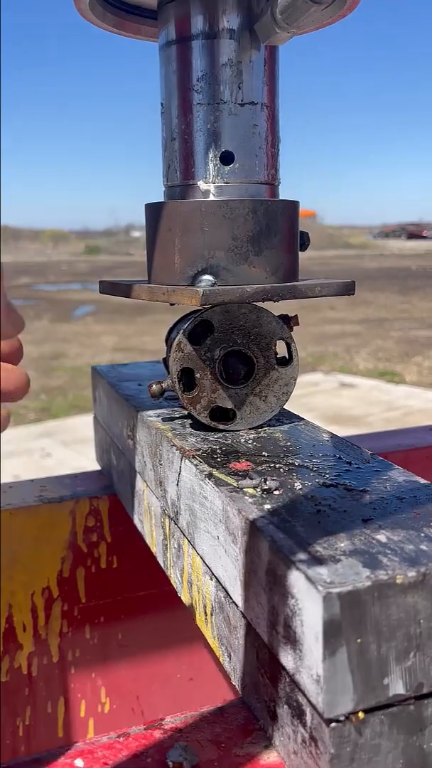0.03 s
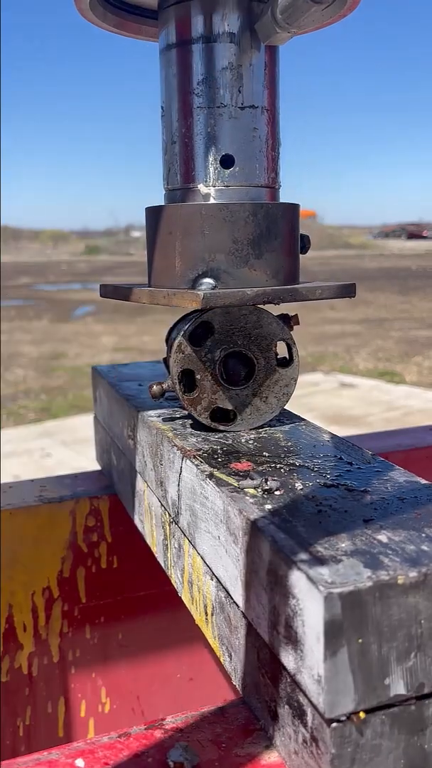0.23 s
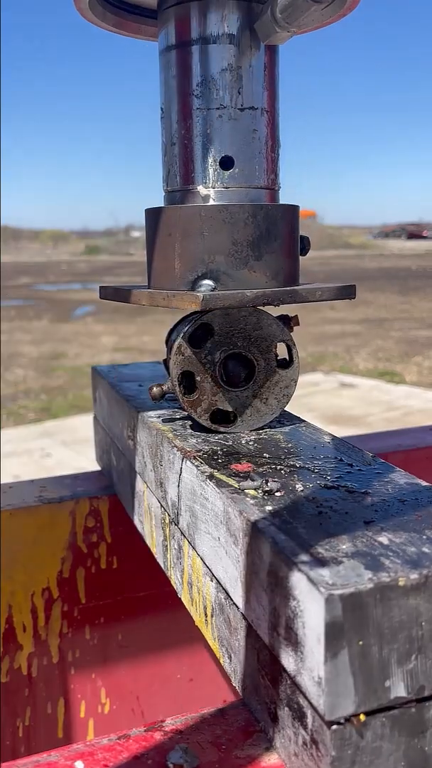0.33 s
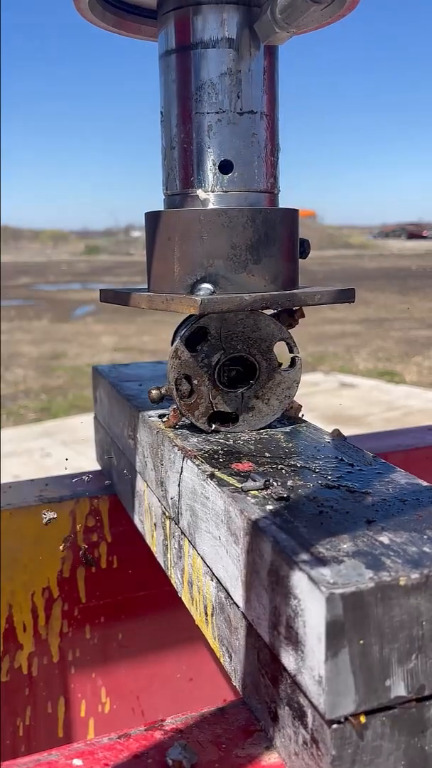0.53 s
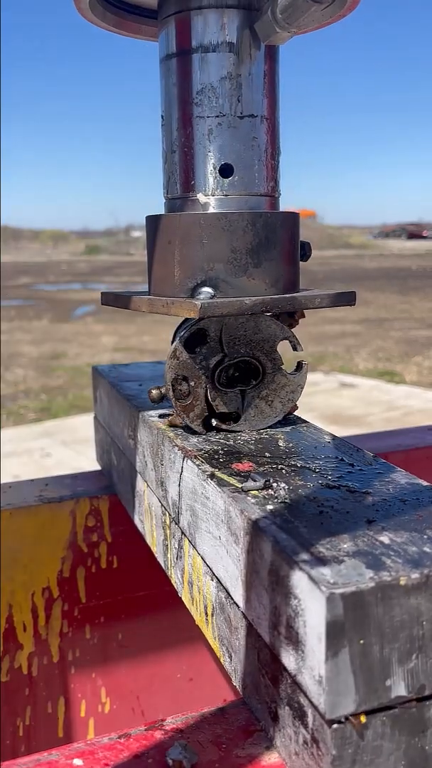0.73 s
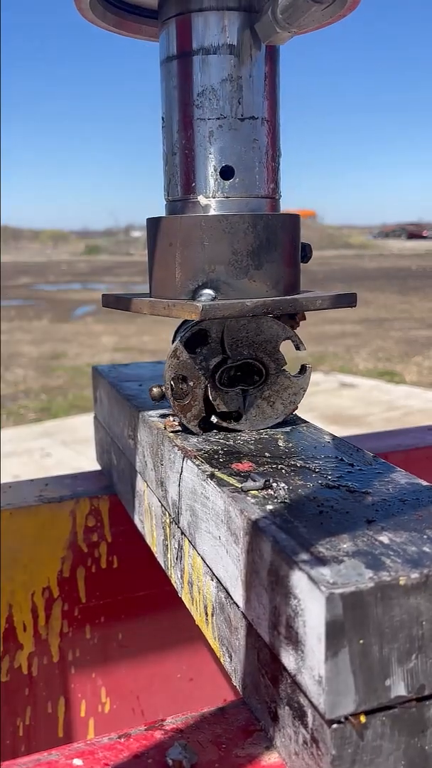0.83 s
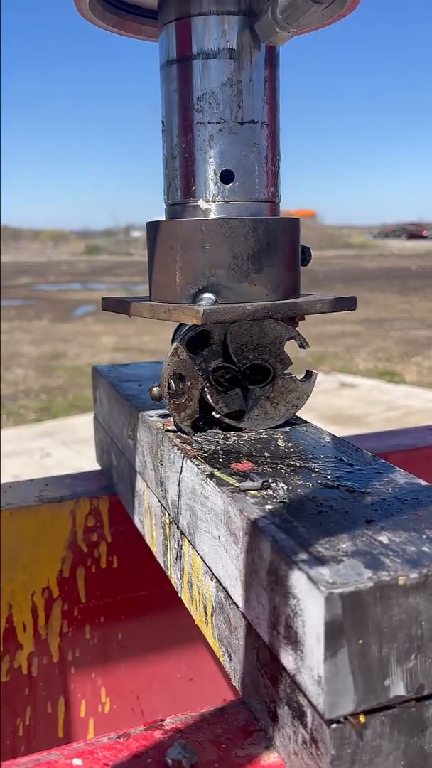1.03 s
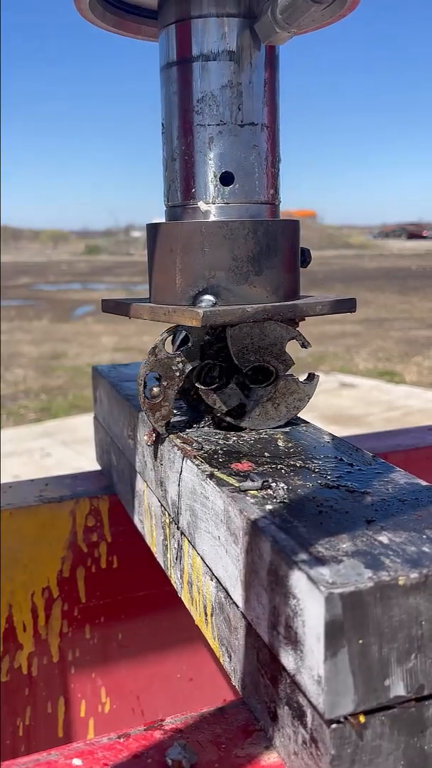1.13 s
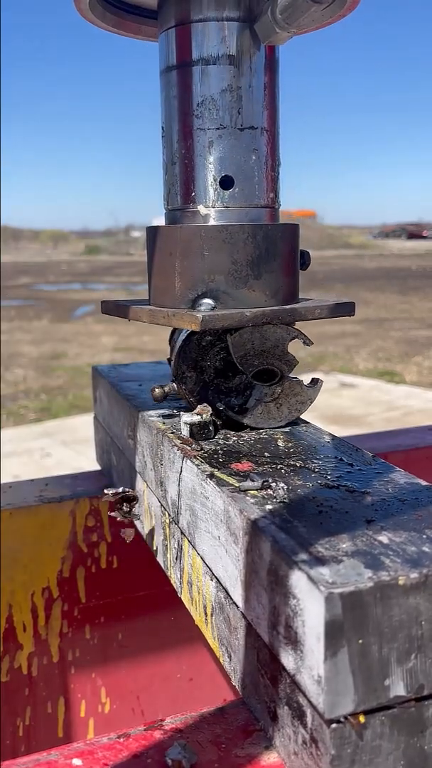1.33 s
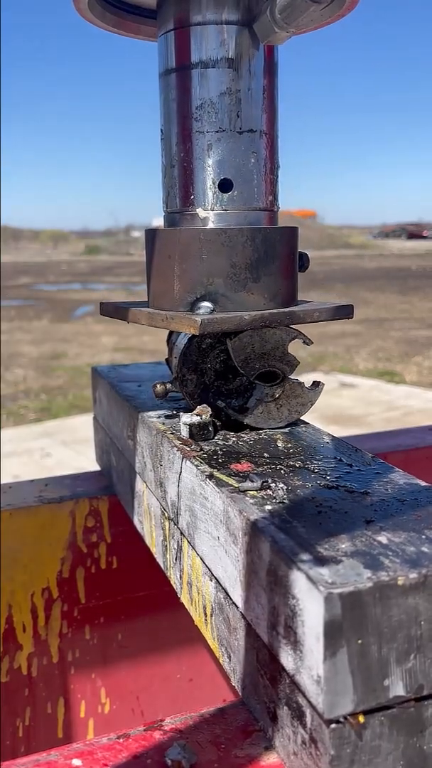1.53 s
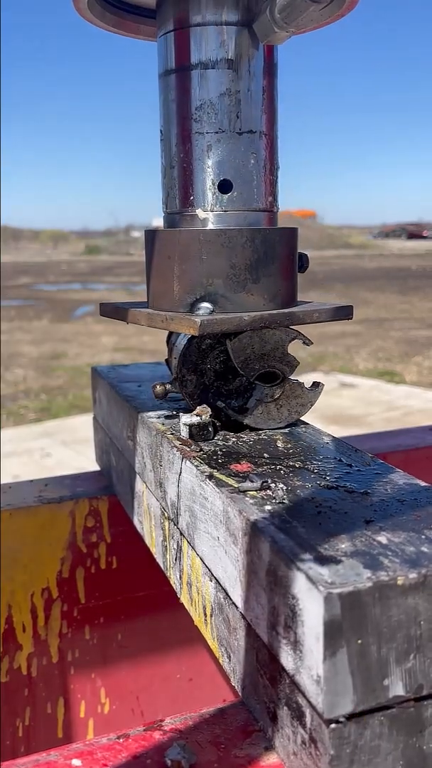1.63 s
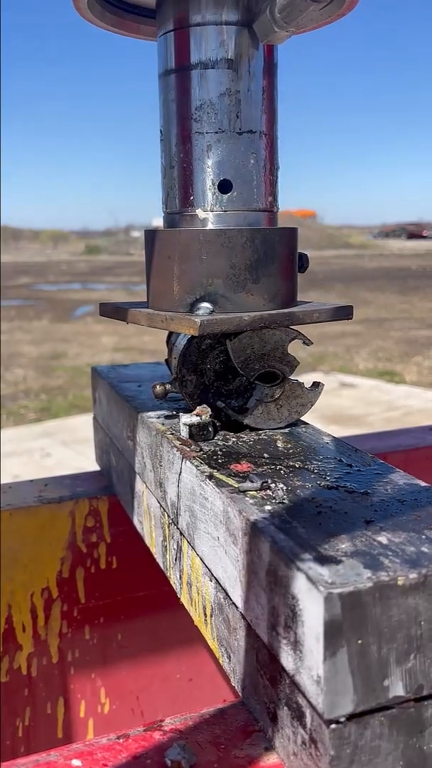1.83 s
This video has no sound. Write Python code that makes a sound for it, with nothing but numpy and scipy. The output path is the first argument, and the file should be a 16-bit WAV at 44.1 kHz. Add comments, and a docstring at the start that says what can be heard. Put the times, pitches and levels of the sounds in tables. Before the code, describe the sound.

Close up and outdoors, a hydraulic press breaks a metal casting with dull crunches and bright cracks, then a loose piece lands and clinks. Underneath, the pump hums, ticks and hisses while a little wind rumbles.

```python
"""A cast metal part is crushed in a hydraulic press, outdoors and close to the microphone.
It yields in dull crunches that jolt the press frame and in bright cracks.
A fragment breaks off and clatters onto the bed; thin tones ring on after the blows.
Sharp high clicks stand out: louder pump ticks among a few snaps of the metal.
The power unit hums, ticks and hisses, quieter once unloaded; a little wind rumbles on the microphone."""
import sys
import numpy as np
from scipy import signal
from scipy.fft import rfft, irfft, next_fast_len
from scipy.io import wavfile
from scipy.ndimage import map_coordinates

SR = 44100
rng = np.random.default_rng(int(sys.argv[2]) if len(sys.argv) > 2 else 0)


def bounce(signal):
    """Save signal as a 16-bit WAV file at the path given by the first command-line argument."""
    frames = np.transpose(np.atleast_2d(signal))
    limited = np.clip(frames, -1, 1)
    pcm = np.round(limited * 32767).astype(np.int16)
    wavfile.write(sys.argv[1], SR, pcm)


N = 83790
TIME_S = np.arange(N) / SR
SIDES = np.array([[.5], [-.5]])  # splits a left-minus-right value


def amp(db):
    return 10 ** (np.asarray(db) / 20)


def unit_rms(x):
    return x / np.sqrt(np.mean(x ** 2) + 1e-20)


def over_hz(points, hz):
    """Interpolate (freq_hz, value) points on a log axis."""
    freqs, values = np.transpose(points)
    return np.interp(np.log(hz + 1), np.log(freqs + 1), values)


def over_time(rows):
    """One per-sample curve for each column after time_s."""
    times, *columns = np.transpose(rows)
    return [np.interp(TIME_S, times, column) for column in columns]


def colour(points):
    """Gain function of a (freq_hz, level_db) spectrum."""
    return lambda hz: amp(over_hz(points, hz))


def wobble(rate_hz):
    """Smooth random curve with knots at rate_hz."""
    return map_coordinates(rng.standard_normal(4096), [TIME_S * rate_hz], mode="mirror")


def filtered(x, response):
    """Apply a complex frequency response."""
    size = next_fast_len(N + 8192)
    return irfft(rfft(x, size) * response(np.fft.rfftfreq(size, 1 / SR)), size)[..., :N]


def noise(gain, coherence=((1000, 1.0),)):
    """Shaped stereo noise of rms 1; both sides are alike by default."""
    def response(hz):
        angle = np.arccos(np.clip(over_hz(coherence, hz), -1, 1)) / 2
        return gain(hz) * np.array([np.cos(angle), np.sin(angle)])
    mid, side = filtered(rng.standard_normal((2, N)), response)
    return unit_rms(np.array([mid + side, mid - side]))


def tone(hz, drift_rad=0):
    """Sine with a random starting phase."""
    return np.sin(2 * np.pi * (hz * TIME_S + rng.random()) + drift_rad)


def strike(start_s, rise_s, t60_s):
    """Envelope of a blow: quick rise, exponential decay."""
    age_s = np.maximum(TIME_S - start_s, 0)
    return (1 - np.exp(-age_s / rise_s)) * amp(-60 * age_s / t60_s)


def swell(age_s, rise_s, t60_s):
    """Exponential rise to a peak at age 0, then decay."""
    return np.exp(np.minimum(age_s, 0) / rise_s) * amp(-60 * np.maximum(age_s, 0) / t60_s)


# wind strength: time_s, level_db
WIND_LEVEL = [(0, -26), (.2, -26), (.39, -23.5), (.47, -45), (.53, -19), (.585, -42), (.66, -21),
              (.78, -26.5), (.85, -37), (.96, -30.5), (1.06, -45), (1.17, -33), (1.22, -27), (1.26, -25.5),
              (1.31, -37.5), (1.41, -19), (1.52, -43.5), (1.6, -41), (1.66, -51), (1.74, -33.5),
              (1.83, -50), (1.89, -35)]
# wind spectrum: freq_hz, level_db
WIND_SPECTRUM = [(20, -29), (40, -2.5), (60, 2), (110, 1), (170, -6), (250, -4.5), (400, -30.5),
                 (1000, -36), (4000, -90)]
# wind, left to right: freq_hz, coherence
WIND_COHERENCE = [(30, .75), (160, .82)]
# single puffs: peak_s, level_db, pitch_hz
PUFFS = [(0.955, -25.5, 101), (1.201, -15, 95), (1.259, -14.5, 69.4)]

def wind(puff_width_s=0.006):
    """Air buffets the microphone: a lumpy rumble and a few thumps."""
    level_db, = over_time(WIND_LEVEL)
    rumble = amp(level_db + 0.62 * wobble(34.07)) * noise(colour(WIND_SPECTRUM), WIND_COHERENCE)
    puffs = np.zeros(N)
    for peak_s, puff_db, hz in PUFFS:
        age_s = TIME_S - peak_s
        puffs += amp(puff_db) * np.exp(-(age_s / puff_width_s) ** 2) * np.cos(2 * np.pi * hz * age_s)
    return rumble + puffs


# pump tick spectrum: freq_hz, level_db
TICK_SPECTRUM = [(3000, -30), (9000, -4), (11500, -3), (13400, 4), (15500, -25)]

def pump_ticks(stroke_hz=43.1, first_s=.0018, width_s=.0009, level_db=-1, scatter_db=2.5):
    """One soft tick of noise per pump stroke."""
    from_stroke_s = (((TIME_S - first_s) * stroke_hz + .5) % 1 - .5) / stroke_hz
    strokes = amp(level_db + scatter_db * wobble(stroke_hz)) * np.exp(-np.abs(from_stroke_s) / width_s)
    return strokes * noise(colour(TICK_SPECTRUM))


def hum_line(hz, level_db):
    """A tone that wavers slightly in level and phase."""
    peak = np.sqrt(2) * amp(level_db + 0.5 * wobble(14.77))
    return peak * np.sin(2 * np.pi * hz * TIME_S + 0.68 * wobble(21.88))


# power unit under changing load: time_s, oil_db, motor_db, drone_db
LOAD = [(0, -42.5, -34.5, -38.5), (.4, -40, -31.5, -39), (.55, -41, -20.5, -50), (.59, -51.5, -35.5, -48),
        (.68, -43, -26.5, -35.5), (.88, -42, -34.5, -38.5), (1.06, -41, -33.5, -36),
        (1.33, -41.5, -33, -29.5), (1.45, -55, -41, -43), (1.53, -52, -46.5, -31), (1.65, -50.5, -42, -48),
        (1.89, -48, -41.5, -48.5)]
# hum lines: pitch_hz, level_re_motor_db
HUM_LINES = [(684, -17), (1071, -14), (1615, -17.5), (2078, -16)]
# motor noise spectrum: freq_hz, level_db
MOTOR_SPECTRUM = [(60, -7), (250, 3), (450, -1), (700, -1.5), (900, -5.5), (1070, -5), (1280, -13.5),
                  (1620, -5.5), (1830, -13.5), (2080, -8), (2500, -13.5), (3000, -6), (4000, -21.5),
                  (5300, -17.5), (6500, -56), (15000, -60)]
# motor noise, left to right: freq_hz, coherence
MOTOR_COHERENCE = [(200, 0.6), (600, 0.13), (1200, 0.12), (2000, 0.79), (4500, 1), (7000, 1)]
# oil hiss spectrum: freq_hz, level_db
HISS_SPECTRUM = [(2000, -25), (5300, -5), (6000, -7), (8200, -8.5), (9000, 2), (9600, -5.5), (10300, -4.5),
                 (11400, -38), (12600, -9), (13400, -16), (14300, -14), (15500, -37)]

def power_unit(drone_hz=264.9, motor_pan_db=4):
    """Motor noise, hum, drone, oil hiss and pump ticks follow the load."""
    oil_db, motor_db, drone_db = over_time(LOAD)
    hum = sum(hum_line(hz, level_db) for hz, level_db in HUM_LINES)
    oil = pump_ticks() + noise(colour(HISS_SPECTRUM))
    motor = noise(colour(MOTOR_SPECTRUM), MOTOR_COHERENCE) + hum
    drone = hum_line(drone_hz, drone_db)
    return amp(motor_db + motor_pan_db * SIDES) * motor + drone + amp(oil_db) * oil


def reflections(x, t60_s=0.18):
    """A short, dulled answer from the press bed and the ground."""
    age_s = np.arange(SR // 2) / SR
    tail = rng.standard_normal((2, len(age_s))) * amp(-60 * age_s / t60_s)
    wet = signal.fftconvolve(x, tail / np.linalg.norm(tail[0]), axes=1)[:, :N]
    return filtered(wet, colour([(2000, 3), (9000, -10)]))


# long modes of part, plate and bed: pitch_hz, t60_s
LONG_MODES = [(447, 0.24), (606, 0.28), (950, 0.14), (1631, 0.39), (2336, 0.48), (2765, 0.89), (4603, 0.37),
              (6665, 0.79)]
# blows that excite them: start_s, then level_db per mode
BLOWS = [(.54, -60, -22, -36, -29, -48, -29, -38, -41), (0.729, -60, -19.5, -60, -54, -50, -33, -54, -70),
         (.905, -60, -38, -50, -26, -25, -51, -55, -70), (1.407, -25, -47, -24.5, -50, -57, -55, -48, -70),
         (1.576, -52, -37, -39, -30.5, -55, -58, -64, -67)]

def after_ring():
    """Thin, wavering tones hang on in the metal after the blows."""
    return sum(amp(level_db) * strike(start_s, 0.0013, t60_s) * tone(hz, 0.53 * wobble(49.6))
               for start_s, *levels_db in BLOWS
               for (hz, t60_s), level_db in zip(LONG_MODES, levels_db))


# clicks, cracks and crunches, left to right: freq_hz, coherence
METAL_COHERENCE = [(200, 1), (1000, 0.65), (2000, 0.92), (4500, 0.81), (8000, 1), (15000, 0.96)]
# sharp high clicks: start_s, level_db, centre_hz
CLICKS = [(0.4956, -17, 9700), (0.4997, -17, 8500), (0.501, -7.5, 2100), (0.5116, -9.5, 13200),
          (0.5163, -6.5, 6940), (.5358, -20, 13200), (0.558, -7.5, 12600), (.695, -22, 12000),
          (0.737, -14, 7300), (0.762, -9, 8060), (.7678, -22, 13000), (0.8603, -29, 14000),
          (0.8734, -22, 13500), (0.8834, -6, 13500), (.895, -19, 13000), (1.6727, -25, 12600)]

def sharp_clicks(rise_s=0.00012, t60_s=.01, half_width_oct=.38):
    """Louder pump ticks among a few snaps of the metal, each around its own pitch."""
    def band(centre_hz):
        return lambda hz: 1 / (1 + (np.log2((hz + 1) / centre_hz) / half_width_oct) ** 2)
    return sum(amp(level_db) * noise(band(centre_hz), METAL_COHERENCE) * strike(start_s, rise_s, t60_s)
               for start_s, level_db, centre_hz in CLICKS)


# fracture and contact spectrum: freq_hz, level_db
CRACK_SPECTRUM = [(150, -2), (700, -4), (1300, -4.5), (2300, -0.5), (2800, -0.5), (3500, -3.5), (4700, 4.5),
                  (6200, 0), (8200, -2.5), (8800, -3), (9400, 3.5), (10300, -4.5), (13300, -4),
                  (15600, -11.5)]

def cracks(events, modes, ripple_db=5.5, ripple_step_hz=60):
    """Fracture or contact gives a bright burst and rings the piece's modes."""
    def gain(hz):
        # a crowd of small resonances at random pitches
        ripple = map_coordinates(rng.standard_normal(2048), [hz / ripple_step_hz], mode="mirror")
        return amp(over_hz(CRACK_SPECTRUM, hz) + ripple_db * ripple)
    out = np.zeros((2, N))
    for start_s, level_db, rise_s, t60_s, ring_db in events:
        burst = noise(gain, METAL_COHERENCE) * strike(start_s, rise_s, t60_s)
        ring = sum(amp(mode_db + rng.normal(0, 0.68)) * strike(start_s, rise_s, mode_t60_s) * tone(hz)
                   for hz, mode_db, mode_t60_s in modes)
        out += amp(level_db) * (burst + amp(ring_db) * ring)
    return out


# grinding spectrum: freq_hz, level_db
CRUNCH_SPECTRUM = [(60, -28), (180, -3.5), (300, 0.5), (430, -3), (600, -3), (1200, -7.5), (2000, -5.5),
                   (3300, -8), (5200, -15), (6500, -18), (9000, -31.5), (15000, -45)]

def crunches(events, resonances, grit_db=1, grit_hz=597, thud_lag_s=0.0035, sag_hz_per_s=230):
    """Metal grinds on metal in a gritty swell that shakes the steel, with a falling thud."""
    def body(hz):
        peaks = sum(amp(peak_db) / np.sqrt(1 + (2 * (hz - centre_hz) / width_hz) ** 4)
                    for centre_hz, width_hz, peak_db in resonances)
        return amp(over_hz(CRUNCH_SPECTRUM, hz)) + 2 * peaks
    out = np.zeros((2, N))
    for peak_s, level_db, rise_s, t60_s, tilt, thud_hz, thud_db in events:
        age_s = TIME_S - peak_s
        grind = noise(lambda hz: body(hz) * amp(tilt * np.log2(1 + hz / 600)), METAL_COHERENCE)
        grit = unit_rms(amp(grit_db * wobble(grit_hz)))
        thud = np.sin(2 * np.pi * (thud_hz * age_s - sag_hz_per_s * age_s ** 2 / 2 + rng.random()))
        out += amp(level_db) * swell(age_s, rise_s, t60_s) * grind * grit
        out += amp(thud_db) * swell(age_s - thud_lag_s, rise_s, t60_s) * thud
    return out


# hits on the bed: peak_s, level_db, rise_s, t60_s, tilt_db_per_oct, thud_hz, thud_db
LANDINGS = [(1.408, -12, 0.0064, 0.077, 4, 137, -17.5), (1.58, -26, 0.018, 0.12, -0.5, 202, -32.5),
            (1.605, -30, 0.011, 0.12, -2.5, 265, -34.5), (1.70, -33, .02, 0.16, 5.5, 244.5, -30)]
# press bed resonances: centre_hz, width_hz, relative_db
BED_RESONANCES = [(463.5, 12, 4.5), (936, 68, -1.5), (1330, 77, -6.5), (1796, 36, -12), (2116, 80, -4.5),
                  (2410, 110, -13), (2858, 61, -2.5), (4710, 160, -16.5)]
# fragment clinks: start_s, level_db, rise_s, t60_s, ring_re_clink_db
CLINKS = [(1.3415, -11, 0.0016, 0.19, -2), (1.364, -19, 0.0018, 0.087, -1.5),
          (1.402, -20, 0.0033, 0.076, -6), (1.418, -18, 0.0011, 0.048, -15),
          (1.502, -34, 0.0028, 0.098, -18), (1.576, -34, 0.0012, .12, -4), (1.675, -33, .001, 0.2, -22)]
# fragment modes: pitch_hz, relative_db, t60_s
FRAGMENT_MODES = [(1742, -11.5, 0.41), (2360, -11, 0.22), (2780, -7, 0.22), (4170, -2.5, 0.11),
                  (4510, -2.5, 0.15), (5100, -6.5, 0.17), (5533, -13, 0.093), (7074, -29, 0.15),
                  (9162, 6, 0.045), (9500, 6, 0.058), (9440, 1, 0.051), (10040, -1, 0.1),
                  (12500, -9, 0.096)]

def falling_fragment():
    """The loose fragment knocks on the press bed and clinks."""
    return crunches(LANDINGS, BED_RESONANCES) + cracks(CLINKS, FRAGMENT_MODES)


# the part yields: peak_s, level_db, rise_s, t60_s, tilt_db_per_oct, thud_hz, thud_db
CRUNCHES = [(.279, -19.5, 0.00084, 0.054, -10, 634, -20.5), (.440, -7.5, 0.0084, 0.097, -4.5, 264, -4.5),
            (.508, -8, 0.0059, 0.089, 0.5, 237, -7), (.530, -7, 0.013, 0.1, 0.5, 181.4, -13),
            (.540, -11, .005, 0.082, 3, 598, -13), (.902, -11.5, 0.013, 0.13, 1.5, 573, -24),
            (0.912, -20, .004, 0.061, -4, 293, -33), (.98, -28, 0.025, 0.25, -0.5, 276, -57)]
# press frame resonances: centre_hz, width_hz, relative_db
FRAME_RESONANCES = [(270, 80, -1.5), (583, 60, -2.5), (797, 71, -7), (1026, 100, -7.5), (1232, 80, -12.5),
                    (1557, 45, -7), (1834, 190, -13.5), (2060, 160, -23), (2800, 53, -7.5),
                    (5070, 120, -26), (7520, 200, -33.5), (13400, 250, -33)]
# the part fractures: start_s, level_db, rise_s, t60_s, ring_re_crack_db
CRACKS = [(0.499, -21.5, 0.00081, 0.12, -25), (0.7137, -9, 0.00083, 0.089, -13),
          (0.761, -15.5, 0.00067, 0.059, -21), (.7985, -11.5, 0.0036, 0.13, -3.5)]
# part modes: pitch_hz, relative_db, t60_s
PART_MODES = [(2860, 0, 0.14), (3200, -9, 0.21), (4550, -6, 0.15), (5030, -16, 0.12), (5533, -3, 0.13),
              (6510, -4, 0.055), (7650, -19, 0.082), (8120, 0, 0.091), (9230, 4.5, 0.071), (11100, 1, .1),
              (11800, -4, 0.094)]

def breaking_part():
    """The casting yields, jolts the frame and cracks."""
    return crunches(CRUNCHES, FRAME_RESONANCES) + cracks(CRACKS, PART_MODES)


def scene():
    """Breaking part, clicks and falling fragment over the power unit and the wind."""
    press = breaking_part() + sharp_clicks() + falling_fragment() + after_ring()
    return press + amp(-21) * reflections(press) + power_unit() + wind()


# stereo widening: freq_hz, left_lead_rad
STEREO_PHASE = [(20, 0), (250, .5), (700, -.1), (1500, 0), (2000, .9), (2800, 2.5), (4100, 1.1),
                (4600, 2.1), (4950, .9), (5800, 3.1), (7800, 6.2), (8400, 6.5), (10850, 9.4), (13000, 12.4),
                (14000, 12.8), (15800, 15.3)]
# stereo balance: freq_hz, left_minus_right_db
STEREO_BALANCE = [(60, 3), (160, 4), (300, 1.5), (600, .5), (1000, -.5), (2800, -2), (4600, -1.5),
                  (7000, 0)]

def record(dry, cutoff_hz=16000):
    """Stereo widening (left leads in phase, more at high pitches), rounded peaks and a treble cut."""
    def widening(hz):
        balance = amp(SIDES * over_hz(STEREO_BALANCE, hz))
        return balance * np.exp(1j * SIDES * over_hz(STEREO_PHASE, hz))
    wide = filtered(dry, widening)
    rounded = wide / (1 + np.abs(wide) ** 6) ** (1 / 6)
    return filtered(rounded, lambda hz: hz < cutoff_hz)


dry = scene()
out = record(dry)
bounce(out)
```